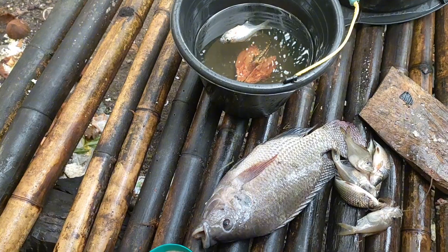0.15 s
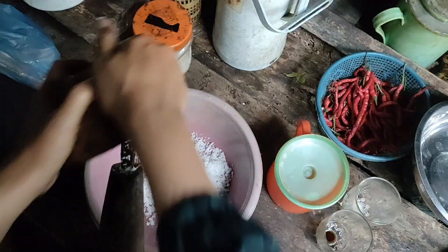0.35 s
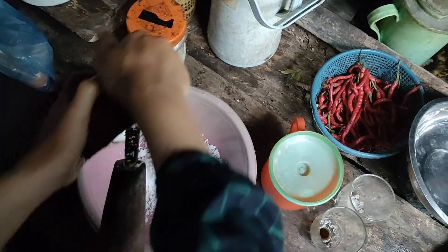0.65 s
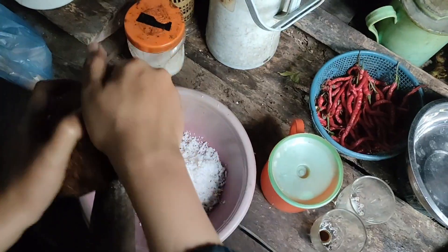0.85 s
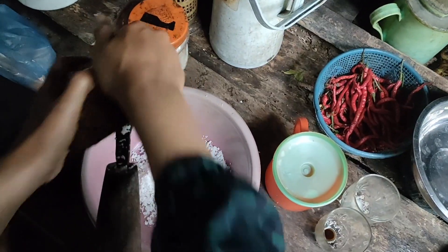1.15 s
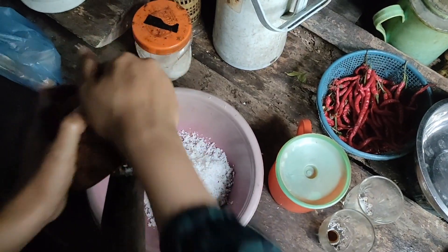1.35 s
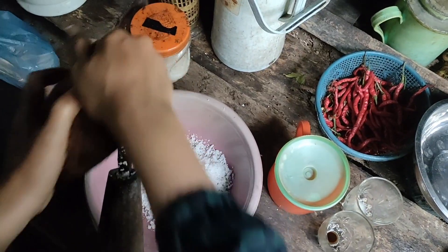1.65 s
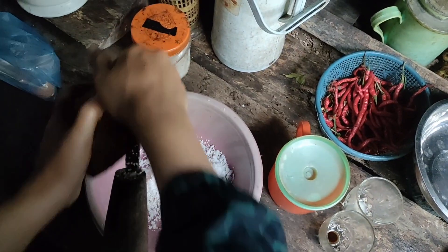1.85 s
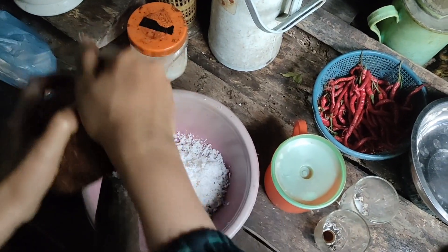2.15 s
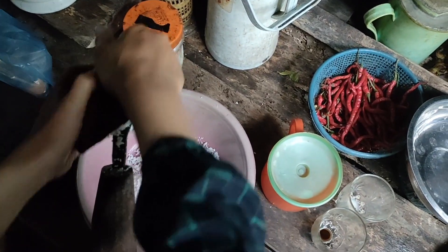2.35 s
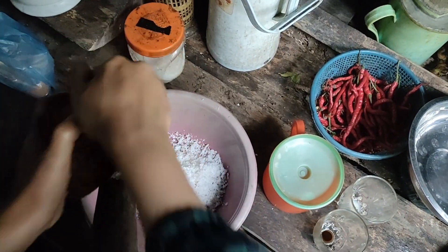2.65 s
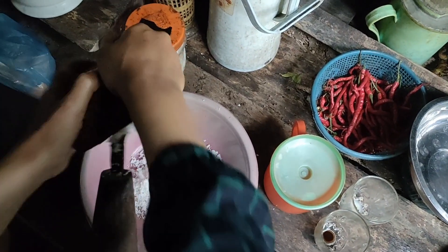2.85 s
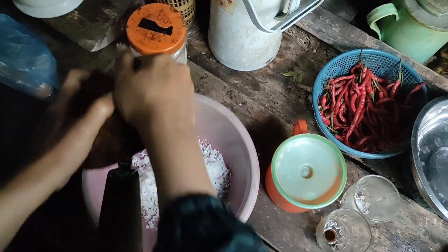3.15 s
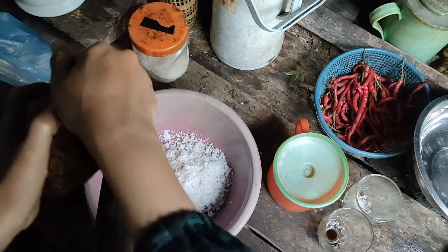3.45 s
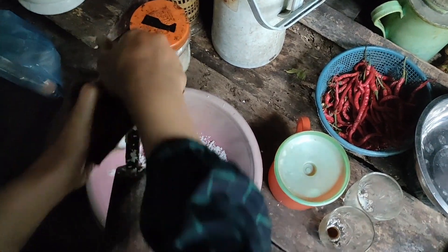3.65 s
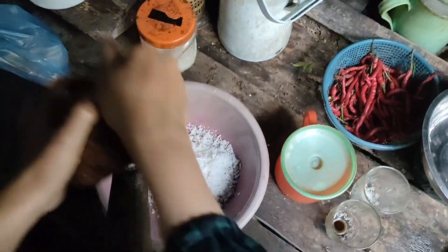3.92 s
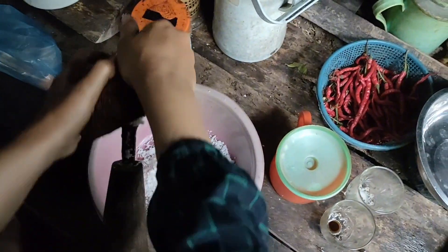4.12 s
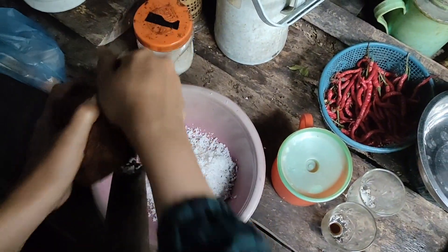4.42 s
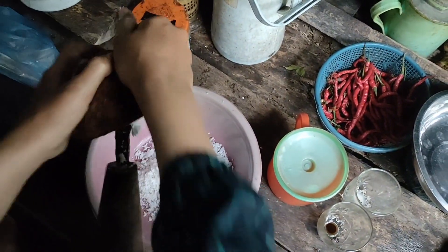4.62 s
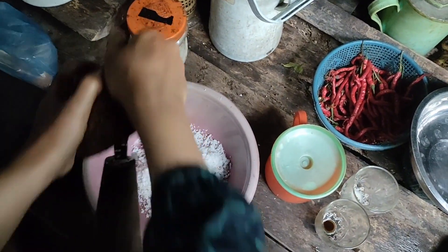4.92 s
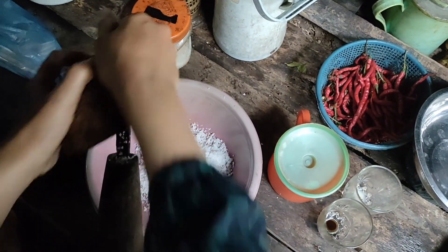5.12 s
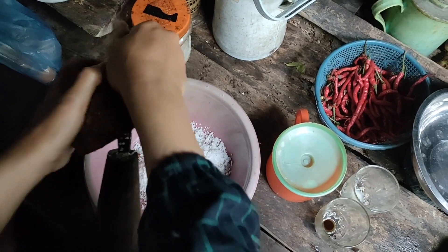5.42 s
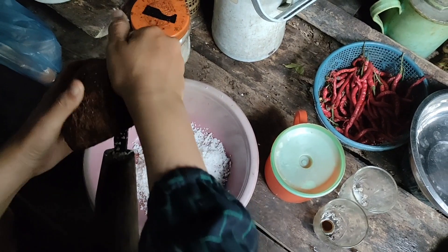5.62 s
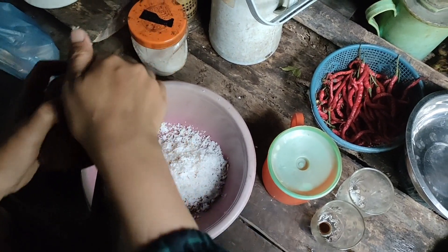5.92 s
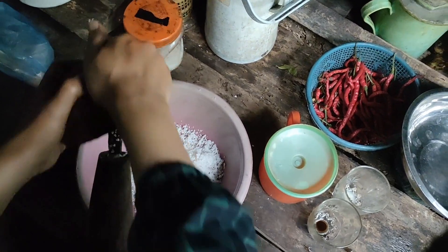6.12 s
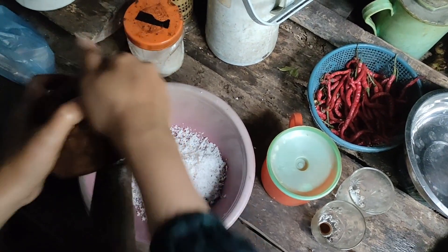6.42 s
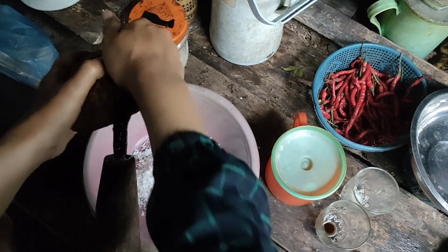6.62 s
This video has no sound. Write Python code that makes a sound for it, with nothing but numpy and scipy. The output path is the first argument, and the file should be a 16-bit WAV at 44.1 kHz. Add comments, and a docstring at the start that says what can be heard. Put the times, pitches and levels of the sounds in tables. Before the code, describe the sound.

After a short insect-filled outdoor moment and a silent gap, thirteen close, gritty coconut scrapes with shell knocks and bench thumps, crickets behind.

```python
"""A moment of outdoor insects and far bird whistles comes first, then half a second of silence.
Then, in an open wooden kitchen, half a coconut is pushed over a toothed grater in thirteen strokes.
Uneven catches of the teeth become bursts of noise for the tearing flesh and clicks that make the shell ring.
The shell knocks and ticks, and the bench thumps with short, deep sine swings.
A bush cricket chirps with sliding tones over the insects, which are narrow bands of noise."""
import sys
import numpy as np
from scipy import signal
from scipy.fft import rfft, irfft
from scipy.io import wavfile
from scipy.ndimage import uniform_filter1d

SR = 44100
rng = np.random.default_rng(int(sys.argv[2]) if len(sys.argv) > 2 else 0)


def wrap_up_sound(samples):
    """Save the sound to the file named by the first command line argument, as 16-bit audio."""
    columns = np.atleast_2d(samples).T
    # keep every value between -1 and 1, then stretch to whole-number steps
    tamed = np.clip(columns, -1, 1)
    steps = np.round(tamed * 32767).astype(np.int16)
    wavfile.write(sys.argv[1], SR, steps)


N = 298557
T = np.arange(N) / SR
HZ = np.fft.rfftfreq(N, 1 / SR)
YARD_END, KITCHEN_START = 0.372, 0.893  # s, with silence between
EDGE_HZ = 15500  # upper limit of the whole sound


def amp(db):
    """Turns decibels into a gain."""
    return 10 ** (np.asarray(db) / 20)


def evened(x):
    """Scales a sound so that the average of its channels has rms 1."""
    middle = np.atleast_2d(x).mean(0)
    return x / np.sqrt(np.mean(middle ** 2) + 1e-20)


def read(points, hz=HZ):
    """Joins the points of a table by straight lines over log frequency."""
    f, value = np.transpose(points)
    return np.interp(np.log(hz + 1), np.log(f + 1), value)


def wander(per_s):
    """Makes a smooth random curve of rms 1 by keeping only the slow part of noise."""
    slow = np.exp(-(HZ / per_s) ** 2)
    return evened(irfft(rfft(rng.standard_normal(N)) * slow, N))


def steadied(x, span):
    """Keeps the fast grain of a sound and evens out its level over span seconds."""
    size = int(span * SR)
    power = uniform_filter1d(uniform_filter1d(x.mean(0) ** 2, size), size)
    return x / np.sqrt(abs(power) + 1e-3)


def echoes(x, t60, start=0.0018):
    """Adds up sparse reflections of random sign that fall 60 dB in t60 seconds, with total energy 1."""
    t = T[:SR // 2]
    sign = rng.choice([-1., 1.], len(t))
    present = (rng.random(len(t)) < .06) * (t > start)
    taps = sign * present * amp(-60 * t / t60)
    return signal.oaconvolve(x, taps / np.linalg.norm(taps))[:N]


# How far the left channel leads the right: pitch_hz, lead_radians
LEAD = [(20, 0), (300, .2), (600, .8), (900, 1.4), (1300, 2.3), (2050, 3.9), (3000, 6.4), (4200, 9.3),
        (6000, 13.8), (9000, 21), (15000, 35)]
# How alike the two channels are: pitch_hz, likeness (0 to 1 after clipping)
LIKENESS = [(50, 0.94), (250, 1), (600, .75), (1200, 0.36), (3000, 0.037), (6000, 0.033), (15000, 0.16)]
# Which channel is louder: pitch_hz, left_minus_right_db
BALANCE_DB = [(60, -0.3), (250, -0.5), (700, -0.4), (1300, -2.3), (2500, -1.9), (4500, -2), (8000, -1.5),
              (15000, 1.5)]


def ports(near, scattered, gain):
    """Colours a sound and spreads it: a shared part with a lag, and a scattered part of opposite sign."""
    same = np.clip(read(LIKENESS), 0, 1)
    side = np.array([[1], [-1]])  # left, right
    mixed = np.sqrt(1 + same) * rfft(near) + side * np.sqrt(1 - same) * rfft(scattered)
    balance = amp(side * read(BALANCE_DB) / 2)
    lead = np.exp(.5j * side * read(LEAD))
    return evened(irfft(mixed * gain * balance * lead, N))


def air(gain):
    """Makes diffuse noise of a given colour."""
    return ports(*rng.standard_normal((2, N)), gain)


# Insect choruses, each a band of noise: pitch_hz, width_hz, yard_db, kitchen_db (before side gains)
CHORUS = [(4490, 470, -48.5, -63), (4950, 490, -55, -86), (9000, 930, -68.5, -80.5)]


def insects(outdoors):
    """Many insects calling at once blend into narrow bands of noise."""
    out = np.zeros((2, N))
    for hz, width, outdoor_db, indoor_db in CHORUS:
        band = np.exp(-2 * ((HZ - hz) / width) ** 2)
        out += air(band) * amp(np.where(outdoors, outdoor_db, indoor_db))
    return out


# Colour of the yard's air: pitch_hz, relative_level_db (per Hz)
YARD = [(25, -8), (80, -10.5), (300, -4.5), (480, -19), (1500, -29), (2300, -14), (3000, -22),
        (3500, -12.5), (5500, -9.5), (6300, -23), (7000, -19), (7700, -37), (10500, -36), (12000, -59)]
# Colour of the kitchen's air: pitch_hz, relative_level_db (per Hz)
KITCHEN = [(18, -39), (30, -4.5), (136, -6), (240, -9), (320, -19.5), (460, -16), (774, -25), (1240, -22.5),
           (1920, -21.5), (2630, -18), (3230, -22.5), (4780, -7.5), (6040, -27), (8920, -33.5),
           (15000, -51)]


def ambience(yard_db=-51, kitchen_db=-52):
    """Air noise and insect choruses waver together, louder and more to the right in the yard."""
    outdoors = T < YARD_END
    chorus = insects(outdoors)
    yard = amp(yard_db) * air(amp(read(YARD))) * amp([[-1.5], [1.5]])
    yard += chorus * amp([[-3], [2]])
    kitchen = amp(kitchen_db + 0.25 * wander(24)) * air(amp(read(KITCHEN))) + chorus
    return np.where(outdoors, yard, kitchen) * amp(1.2 * wander(77))


# Far bird whistles: start_s, length_s, start_pitch_hz, end_pitch_hz, level_db (before the overall lift)
WHISTLES = [(0.097, .03, 2420, 2200, -54), (0.123, 0.145, 2300, 2190, -60.5), (.122, .055, 2830, 2820, -64),
            (5.68, 0.123, 2480, 2600, -67), (5.848, .1, 2600, 2310, -67)]


def whistles(waver_hz=50, lift_db=3):
    """Far birds: soft tones glide between two pitches with a waver and blurring echoes."""
    out = np.zeros(N)
    waver = waver_hz * wander(110)
    for s, length, start_hz, end_hz, db in WHISTLES:
        through = np.clip((T - s) / length, 0, 1)
        hz = start_hz + (end_hz - start_hz) * through + waver
        swell = np.sqrt(abs(np.sin(np.pi * through)))
        out += amp(db) * swell * np.sin(2 * np.pi * np.cumsum(hz) / SR)
    return amp(lift_db) * np.array([out + .5 * echoes(out, t60=.12) for _ in range(2)])


WING_S = .012  # one wing stroke of the cricket
# The cricket's rhythm; chirps between rows are evenly spaced: time_s, chirps_so_far (count)
CHIRPS = [(0.835, 0), (1.185, 2), (1.715, 5), (2.083, 7), (2.61, 10), (3.84, 17), (5.24, 25), (5.937, 29),
          (6.815, 34)]


def cricket(top_hz=5920, fall_hz=750, sag_db=4, level_db=-53, wet_db=-1, count=6):
    """Each chirp is six wing strokes, each sliding down in pitch, blurred by the surroundings."""
    s, number = np.transpose(CHIRPS)
    chirp = np.floor(np.interp(T, s, number))
    age = T - np.interp(chirp, number, s)  # time since the chirp began
    through = (age % WING_S) / WING_S  # 0 to 1 within a wing stroke
    hz = top_hz - fall_hz * through ** 2 + 90 * wander(940)
    tone = np.sin(2 * np.pi * np.cumsum(hz) / SR)
    call = tone * np.sqrt(np.sin(np.pi * through)) * (age < count * WING_S)
    swell = np.sqrt(abs(np.sin(np.pi * (age + WING_S) / ((count + 2) * WING_S))))
    call *= swell * amp(1.5 * wander(30) - sag_db * through)
    far = np.array([echoes(call, t60=.15), echoes(call, t60=.15)])
    return amp(level_db) * evened(0.62 * call + amp(wet_db) * far) * amp([[-.5], [.5]])


# The bench rocks under the push: middle_s, level_db, pitch_hz
THUMPS = [(1.078, -32, 61), (1.485, -21.5, 54), (1.904, -23.5, 54), (2.334, -27, 54), (2.422, -32, 81.6),
          (2.786, -25, 60), (3.173, -20.5, 55.4), (3.662, -23.5, 53), (4.073, -26, 70), (4.531, -34, 58),
          (4.935, -21, 73), (6.166, -31, 78), (6.547, -18.5, 72), (6.75, -38, 75)]


def thumps(rise_s=.012, fall_s=0.018):
    """Each time the bench rocks it swings through about two deep cycles."""
    out = np.zeros(N)
    for (s, db, hz), turn in zip(THUMPS, rng.random(len(THUMPS))):
        age = T - s
        swing = np.exp(-(age / np.where(age < 0, rise_s, fall_s)) ** 2)
        out += amp(db) * swing * np.sin(2 * np.pi * (hz * age + turn))
    return out


# Small sharp ticks: time_s, level_db (before the overall lift), upper_edge_hz
TICKS = [(3.768, -15, 6160), (3.96, -19, 4600), (5.807, -41, 4000)]


def ticks(low_hz=900, lift_db=10):
    """Tiny dry ticks: single clicks passed through a band filter, with no body ring."""
    out = np.zeros(N)
    for s, db, top_hz in TICKS:
        band = signal.butter(3, [low_hz, top_hz], "band", fs=SR, output="sos")
        click = signal.unit_impulse(N, round(s * SR))
        out += amp(db + lift_db) * signal.sosfilt(band, click)
    return out


# Resonances of shell, grater and bench: pitch_hz, width_hz, left_lift_db, right_lift_db
MODES_OF_BODY = [(135, 16, 5, 5), (168, 16, 3, 3), (213, 20, 7, 7), (258, 24, 8, 8), (329, 24, 8, 4),
                 (460, 45, 4, 0), (571, 16, 6, 8), (616, 16, 6, 0), (673, 22, 11, 10), (859, 20, 5, 1),
                 (919, 20, 3, 8), (1097, 36, 5, 10), (1175, 24, 9, 6), (1315, 40, 4, 6), (1453, 28, 6, 6),
                 (1724, 34, 6, 8), (1990, 50, 2, 4), (2153, 45, 8, 5), (2530, 50, 1, 5), (2975, 45, 2, 8),
                 (3290, 55, 6, 6), (3638, 60, 6, 9)]


def body():
    """Shell, grater and bench strengthen certain pitches, differently on each side."""
    response = np.ones((2, len(HZ)), complex)
    for hz, width, left_db, right_db in MODES_OF_BODY:
        lift = amp([[left_db], [right_db]]) - 1
        response *= 1 + lift / (1 + 2j * (HZ - hz) / width)
    return response


def ring(drive, colour, response, scatter_s=0.0042, diffuse=0.75):
    """A force rings the body; bowl, hands and floor scatter each click into a short wash."""
    keep = np.exp(-1 / (scatter_s * SR))
    envelope = np.sqrt(signal.lfilter([1 - keep], [1, -keep], drive ** 2))
    wash = envelope * rng.standard_normal((2, N))
    near = (drive + diffuse * wash[0]) / np.hypot(1, diffuse)
    return ports(near, wash[1], amp(read(colour)) * response)


def snaps(per_s, spread_db):
    """Random clicks of both signs, a few of them much larger than the rest."""
    size = amp(spread_db * np.minimum(rng.exponential(1, N), 4))
    return size * rng.choice([-1., 1.], N) * (rng.random(N) < per_s / SR)


# Shell knocks: start_s, body_db, hollow_ring_db, scuff_db (before the overall lift), fade_s
KNOCKS = [(0.923, -49, -56, -40.5, 0.017), (0.995, -19.5, -27, -28.5, 0.023), (1.024, -22, -40, -49, 0.017),
          (2.961, -34, -52, -64, 0.026), (3.543, -50, -48, -41.5, 0.016), (3.835, -40, -62, -60, 0.042),
          (4.021, -20, -31, -54, 0.016), (4.358, -41, -41, -48, 0.025), (4.703, -41.5, -69, -61, 0.022),
          (4.886, -18.5, -26, -40, 0.018), (5.467, -34.5, -52, -58, .02), (5.538, -43.5, -37, -45.5, 0.02),
          (6.129, -29, -22, -44, 0.013), (6.446, -44.5, -51, -60, 0.022), (6.504, -22.5, -26, -32, 0.03)]
# Colour of the dull knock: pitch_hz, relative_level_db (per Hz)
KNOCK = [(40, -47), (150, -8.5), (260, 6.5), (400, -6), (600, -11), (1500, -71)]
# Colour of the shell's hollow, also used by the grating: pitch_hz, relative_level_db (per Hz)
HOLLOW = [(200, -16), (420, 4), (560, -2.5), (690, -0.5), (780, -1), (950, -3), (1150, -4), (1380, -5.5),
          (1550, -11), (3000, -54)]
# Colour of scuffs and tearing flesh, also used by the grating: pitch_hz, relative_level_db (per Hz)
TEAR = [(600, -26), (1100, -7.5), (1380, -9.5), (1540, -9.5), (2100, -1.5), (3000, -2), (3800, -3),
        (4400, -4), (6200, -8), (7200, -17), (8600, -27), (12000, -31.5), (15500, -43)]


def knocks(response, rise_s=0.00235, lift_db=3, blow_db=17):
    """The shell lands or catches on the blade with a dull rattle, a hollow ring and a short scuff."""
    levels = np.zeros((3, N))
    rattle = snaps(per_s=2700, spread_db=2.5)
    for s, *parts_db, fade in KNOCKS:
        age = np.maximum(T - s, 0)
        shape = (1 - np.exp(-age / rise_s)) * np.exp(-age / fade)
        levels += amp(parts_db)[:, None] * shape
        rattle[round((s + rise_s) * SR)] += amp(blow_db)  # one firm blow leads each rattle
    out = np.zeros((2, N))
    for level, colour in zip(levels, (KNOCK, HOLLOW, TEAR)):
        out += level * steadied(ring(rattle, colour, response), span=0.0036)
    return amp(lift_db) * out


CONTACT_S, BITE_S = 0.01, 0.024  # time for the teeth to meet the flesh; half length of the deepest bite
# Strokes; the levels are before each part's own trim, and bite_db before its own scaling:
# start_s, attack_s, hold_s, deepest_bite_s (after the start), bite_db, tearing_db, judder_db, hollow_ring_db
STROKES = [ (0.96, 0.051, 0.091, 0.072, 5, -30.5, -30.3, -31.5),
           (1.392, .045, 0.13, 0.055, 2, -34, -35.5, -39.5),
           (1.825, 0.03, .132, 0.079, 2.5, -33, -32, -38.5), (2.237, 0.049, 0.14, .11, 2.5, -32, -31, -37),
           (2.643, 0.085, 0.13, 0.13, 5.5, -33.5, -34.5, -37),
           (3.119, 0.043, 0.11, 0.069, 6.5, -30, -29, -31.5),
           (3.586, .018, 0.14, 0.053, 4, -34.5, -36.5, -41), (4.01, 0.041, .12, .085, 5, -32, -30.5, -34),
           (4.438, 0.056, .096, 0.071, 2.1, -32.5, -31, -35),
           (4.879, 0.022, 0.14, .042, 5, -33.5, -31, -35.5),
           (5.305, 0.057, 0.054, 0.078, 6.5, -33.5, -32, -36),
           (6.033, 0.098, 0.091, 0.12, 1.5, -31, -27.7, -31),
           (6.479, .058, 0.065, 0.061, 3, -28, -25.9, -30), ]


def effort(part, bite_gain, build_db_per_s, release_db_per_s, lag_s):
    """Gain of a part (0 tear, 1 judder, 2 hollow): the push builds, holds, eases and surges at the bite."""
    gain = np.zeros(N)
    for start, attack, hold, bite_at, bite_db, *parts_db in STROKES:
        age = np.maximum(T - start, 0)
        contact = np.minimum(age / CONTACT_S, 1)
        building = build_db_per_s * np.maximum(attack - age, 0)
        easing = release_db_per_s * np.maximum(age - attack - hold, 0)
        surge = bite_gain * bite_db * np.exp(-((age - bite_at - lag_s) / BITE_S) ** 2)
        gain += contact * amp(parts_db[part] + surge - building - easing)
    return gain


# Larger clumps of fibres rip loose: middle_s, rise_db
RIPS = [(1.555, 1.5), (3.258, 2.5), (4.113, 4.5), (5.018, 3.5), (6.2, 4), (6.594, 4.5)]


def rips(half_s=.011):
    """The tearing swells briefly as each clump rips loose."""
    return amp(sum(db * np.exp(-((T - s) / half_s) ** 2) for s, db in RIPS))


# Light brushes over the teeth between strokes: middle_s, half_length_s, level_db
BRUSHES = [(1.362, 0.024, -48), (1.81, 0.015, -46.5), (2.222, 0.051, -53.5), (3.509, 0.037, -48.5),
           (3.95, 0.048, -50.5), (4.422, 0.019, -44.5), (4.842, 0.062, -57.5), (6.457, 0.021, -46.5)]


def brushes():
    """The tearing sound swells softly as the flesh brushes the teeth."""
    return sum(amp(db) * np.exp(-((T - s) / half) ** 2) for s, half, db in BRUSHES)


def slips(per_s, jitter, spread_db):
    """The teeth catch and let go at uneven intervals and with uneven strength."""
    turns = np.cumsum(per_s * np.exp(jitter * wander(120))) / SR
    let_go = np.diff(np.floor(turns), prepend=0)
    return let_go * amp(spread_db * rng.standard_normal(N))


# Colour of the juddering shell: pitch_hz, relative_level_db (per Hz)
JUDDER = [(40, -47.5), (90, -10), (135, -0.5), (170, 0.5), (240, -1), (320, -1), (400, -10), (520, -18.5),
          (750, -23), (1600, -65)]
# Colour of the bench's rumble: pitch_hz, relative_level_db (per Hz)
THUMP = [(12, -25), (28, -8), (52, -4.5), (72, -2), (92, 2), (130, -9), (250, -25), (600, -85)]


def grating(response, burst_s=.002, smooth=0.98, tear_db=-.5, judder_db=-.5, hollow_db=.5,
            rumble_db=-9, blade_db=-9, blade_hz=3740, blade_width_hz=300):
    """Each slip shakes the shell and tears a burst of fibres; the push also sets the bench rumbling."""
    slip = slips(per_s=170, jitter=.45, spread_db=4.0)
    tear = effort(part=0, bite_gain=1.08, build_db_per_s=194, release_db_per_s=253, lag_s=0.0032) * rips()
    judder = effort(part=1, bite_gain=1.51, build_db_per_s=320, release_db_per_s=210, lag_s=-0.0016)
    # a hard bite wakes the hollow of the shell
    bite = effort(part=2, bite_gain=1.55, build_db_per_s=340, release_db_per_s=297, lag_s=0.00083)
    push = effort(part=1, bite_gain=.5, build_db_per_s=420, release_db_per_s=175, lag_s=.001)

    bursts = signal.lfilter([1], [1, -np.exp(-1 / (burst_s * SR))], slip)
    clumps = amp(2 * wander(41))  # the flesh gives way in uneven bunches
    tearing = snaps(per_s=3000, spread_db=2.5) * (smooth + bursts) * clumps
    fibres = ring(tearing, TEAR, response)
    shaking = evened(slip - slip.mean())
    shell = ring(shaking, JUDDER, response, diffuse=0.71)
    hollow = ring(shaking + evened(snaps(per_s=900, spread_db=4.0)), HOLLOW, response)
    # the blade is a narrow band of noise that follows the tearing
    blade = air(np.exp(-((HZ - blade_hz) / blade_width_hz) ** 2))
    bench = air(amp(read(THUMP)))
    return ((amp(tear_db) * tear + brushes()) * steadied(fibres, span=0.019)
            + amp(judder_db) * judder * steadied(shell, span=0.013)
            + amp(hollow_db) * bite * steadied(hollow, span=0.027)
            + amp(blade_db) * tear * blade
            + amp(rumble_db) * push * steadied(bench, span=0.028))


def scene():
    """The work is close by with a little of the room, and the outdoors lies behind it."""
    response = body()
    behind = ambience() + whistles() + cricket() * (T > KITCHEN_START)
    work = knocks(response) + grating(response)
    left_room = echoes(work[0], t60=0.055, start=0.00757)
    right_room = echoes(work[1], t60=0.16, start=.008)
    room = amp(-11.0) * np.array([left_room, right_room])
    return behind + thumps() + ticks() + work + room


def record(dry):
    """Puts silence between the two places, then removes everything above the upper limit."""
    sounding = 1. * ((T < YARD_END) | (T > KITCHEN_START))
    running = uniform_filter1d(sounding, size=64)  # softens the edges of the silence
    low_pass = signal.firwin(401, EDGE_HZ, window=("kaiser", 9), fs=SR)
    return signal.oaconvolve(dry * running, low_pass[None], "same")


dry = scene()
out = record(dry)
wrap_up_sound(out)
```